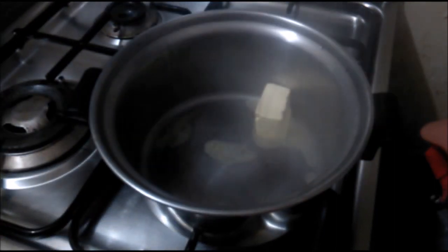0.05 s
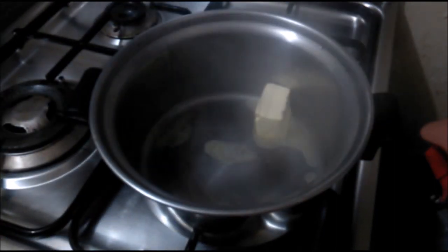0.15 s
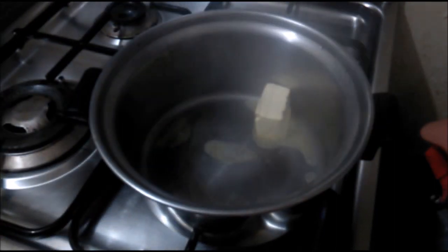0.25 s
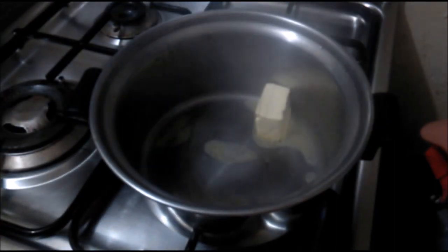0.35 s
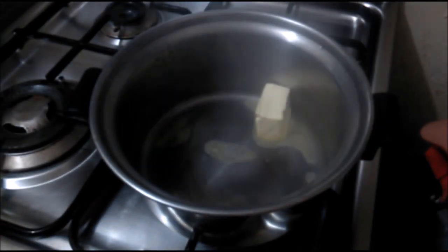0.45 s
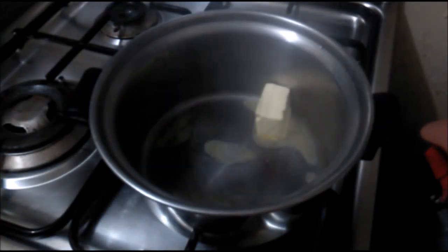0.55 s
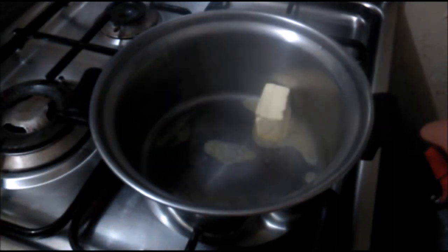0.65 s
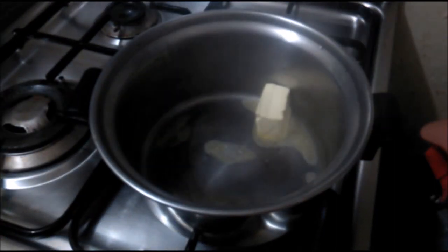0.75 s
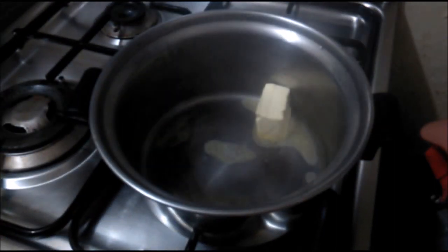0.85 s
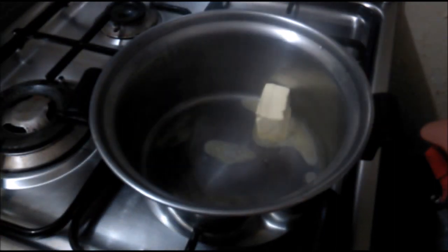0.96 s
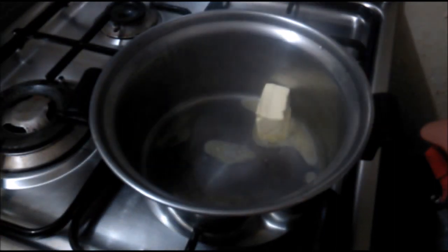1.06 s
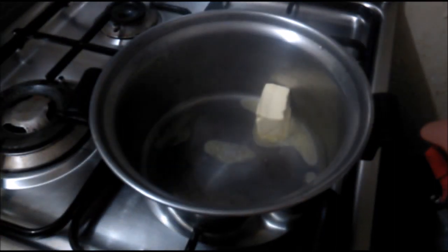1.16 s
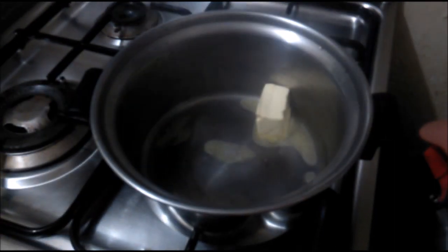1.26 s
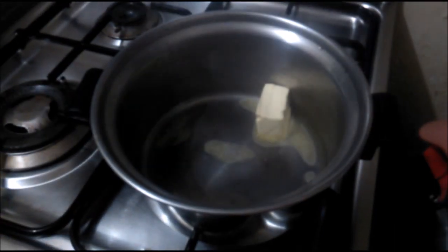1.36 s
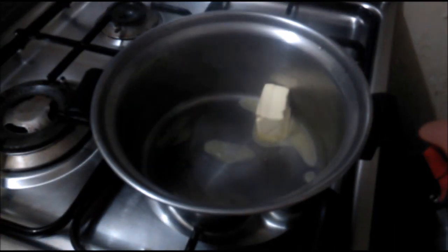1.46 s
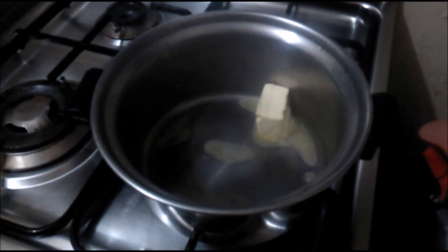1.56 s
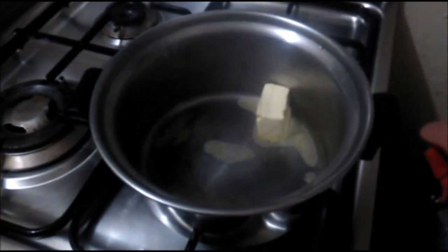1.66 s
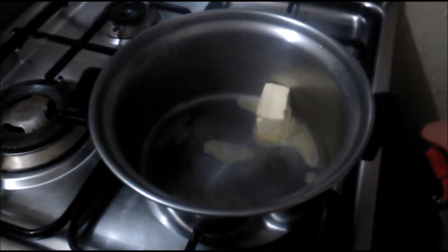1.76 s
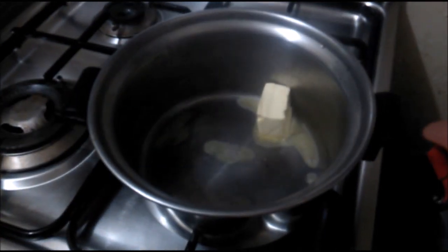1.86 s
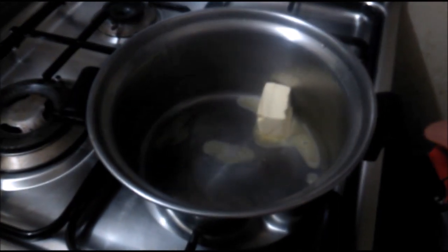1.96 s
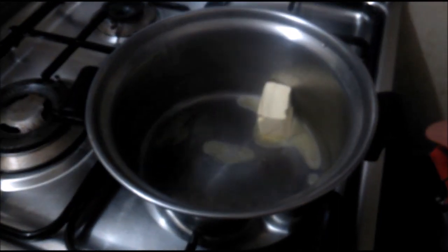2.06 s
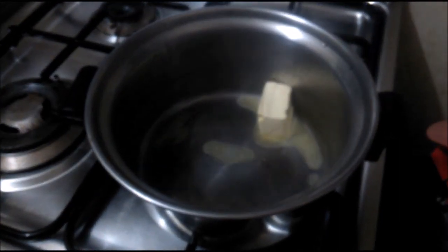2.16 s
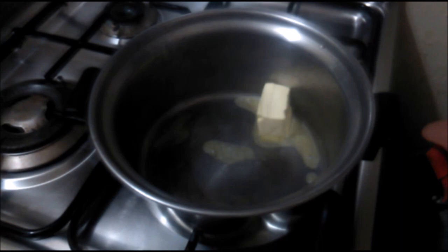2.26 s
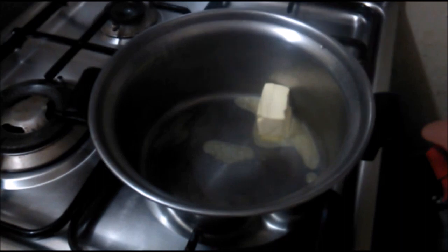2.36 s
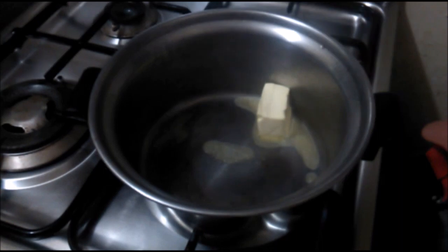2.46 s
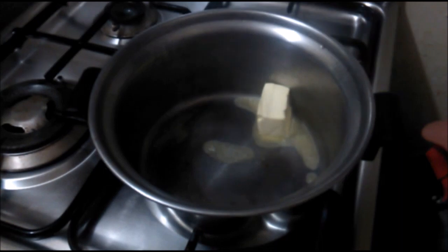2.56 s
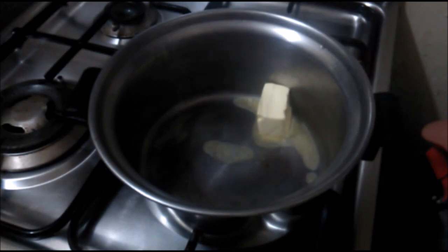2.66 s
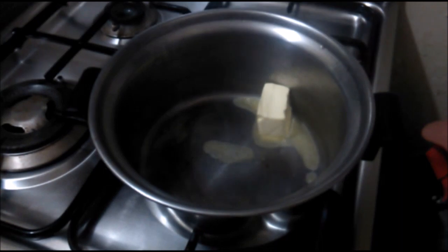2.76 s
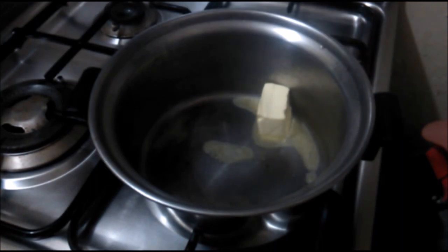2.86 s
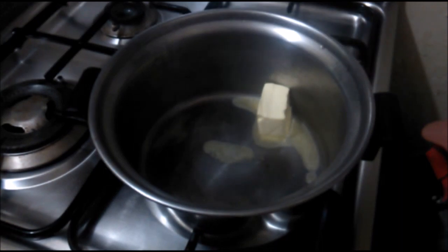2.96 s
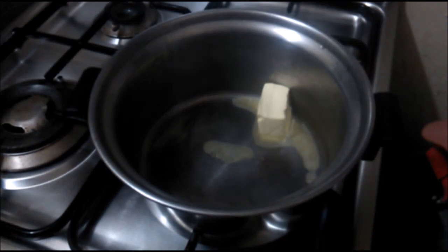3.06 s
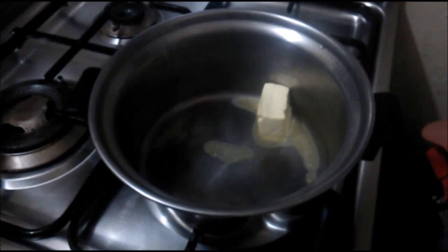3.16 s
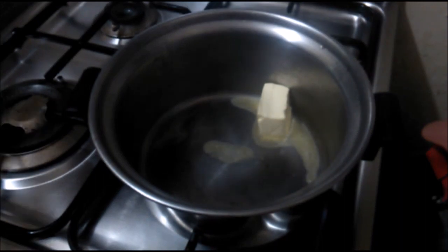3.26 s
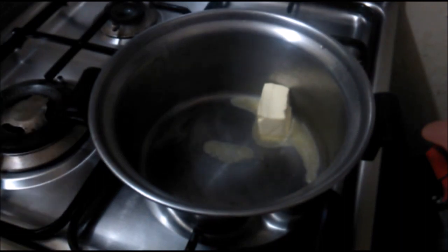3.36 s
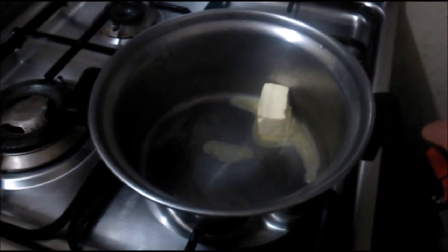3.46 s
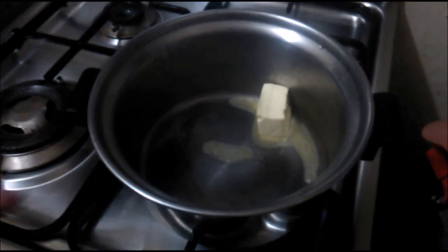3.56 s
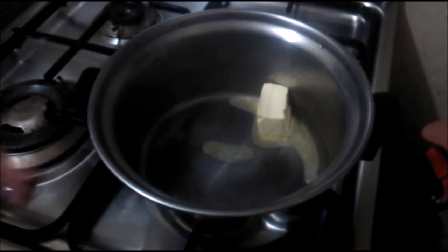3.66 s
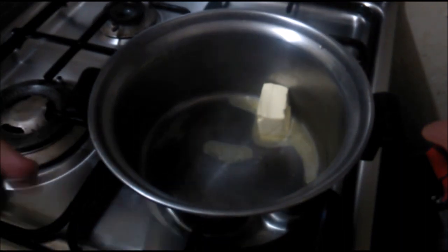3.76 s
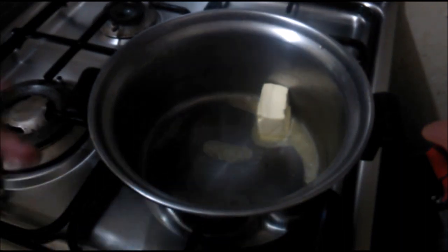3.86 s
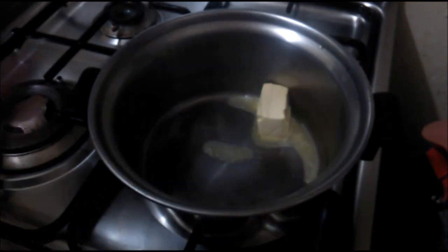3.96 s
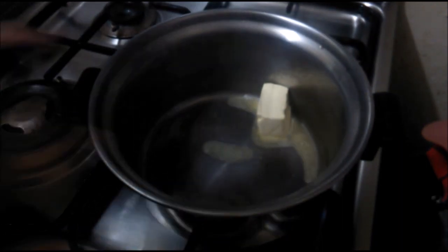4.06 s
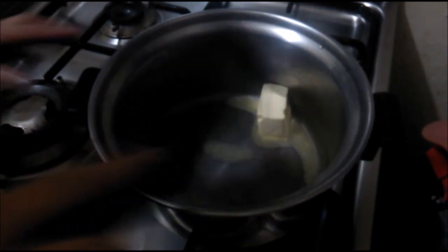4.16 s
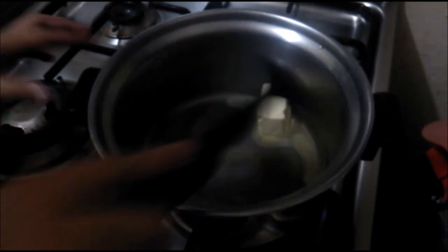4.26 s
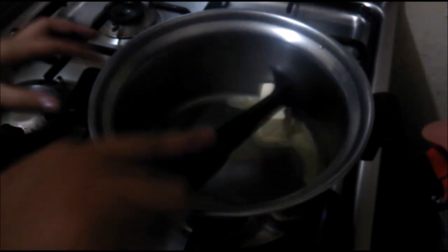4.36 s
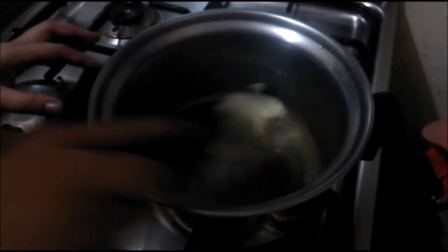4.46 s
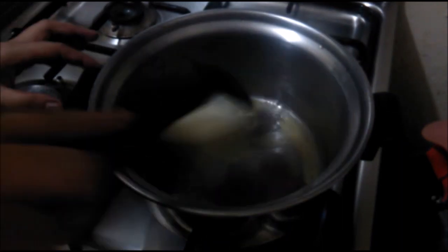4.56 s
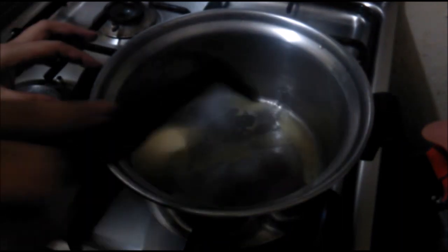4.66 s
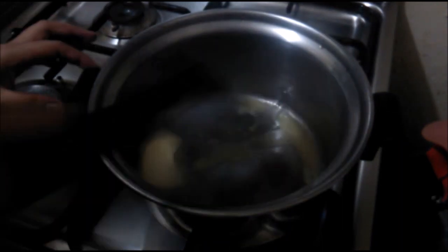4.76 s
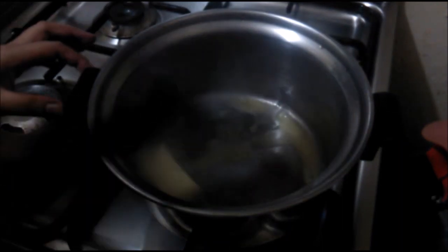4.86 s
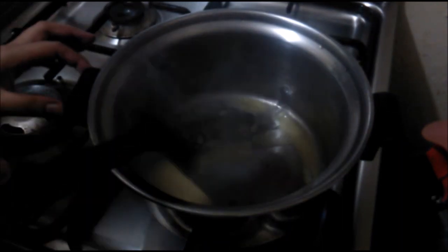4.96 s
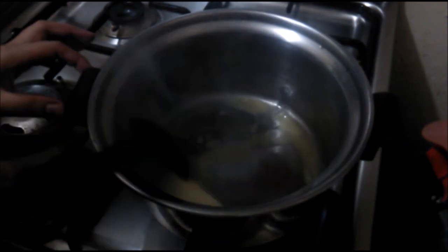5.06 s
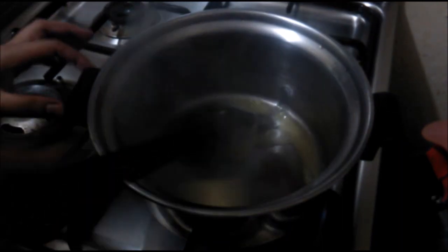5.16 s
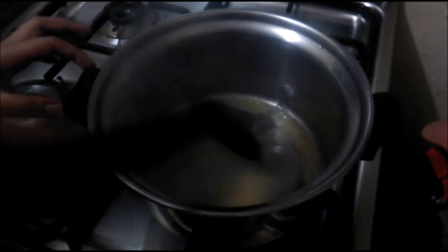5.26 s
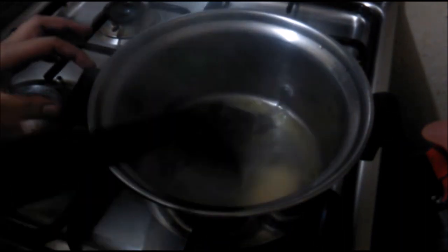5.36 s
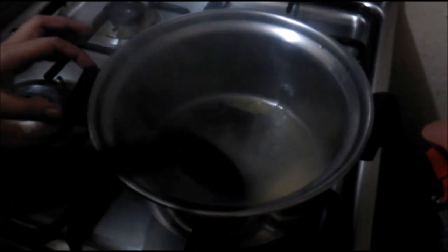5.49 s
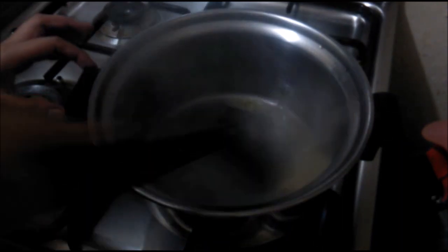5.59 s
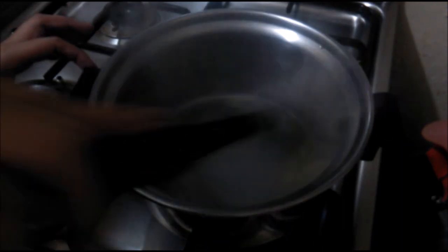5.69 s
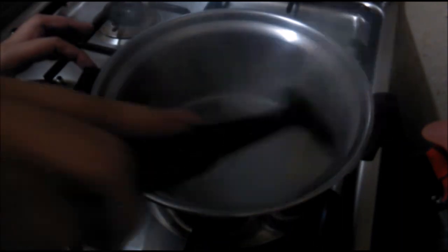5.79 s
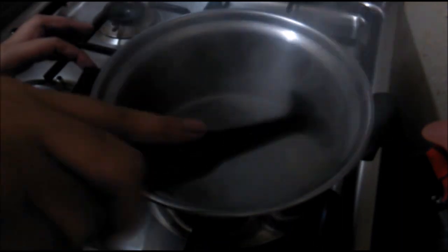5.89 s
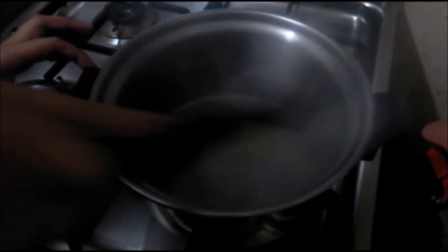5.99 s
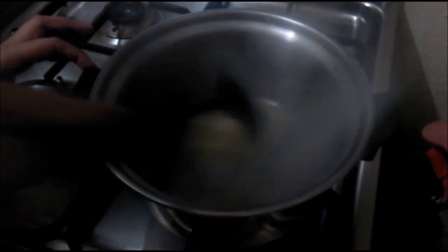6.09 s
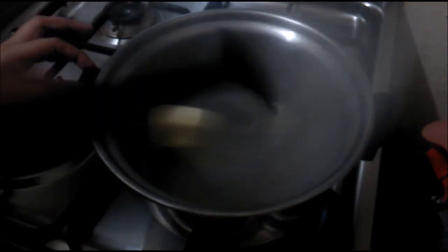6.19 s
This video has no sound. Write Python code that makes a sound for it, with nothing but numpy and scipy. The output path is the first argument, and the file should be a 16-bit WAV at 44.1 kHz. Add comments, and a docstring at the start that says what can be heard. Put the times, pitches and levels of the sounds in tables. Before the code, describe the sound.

Close above a pot in a small home kitchen, butter sizzles with bright, fine fizz, crackle and small spits over a faint beating electrical hum. A metal utensil rasps sharply early on, and two dull bumps follow mid-way. Then a spatula pushes the butter round: the sizzle swells and thickens, the blade knocks, judders and briefly squeals against the ringing steel, and softer strokes follow.

```python
"""Butter sizzling in a steel pot

Close on a kitchen stove, one microphone above the pot: butter melts over a low electrical hum.
Pulse trains make the fizz, crackle and spits; a hum of two beating pairs of sines lies behind.
A utensil scrapes as it is picked up, a pulse train driving its modes, and two dull noise bumps
sound in the room. Then a spatula pushes the butter round: the sizzle swells, and the blade
knocks, judders and squeals on the ringing pot, a bank of decaying sines."""
import sys
import numpy as np
from scipy import signal
from scipy.fft import rfft, irfft, next_fast_len
from scipy.io import wavfile
from scipy.ndimage import map_coordinates

SR = 44100
rng = np.random.default_rng(int(sys.argv[2]) if len(sys.argv) > 2 else 0)


def pcm_store(signal):
    """Save signal as 16-bit PCM."""
    levels = np.round(np.clip(np.atleast_2d(signal), -1, 1) * 32767)
    wavfile.write(sys.argv[1], SR, levels.astype(np.int16).T)


N = 274743

# Spectra, relative levels: (f/Hz, density/dB per Hz)
# distant: the rush of the room, and dull bumps
ROOM_SPECTRUM = [(20, -12), (55, 4), (130, -0.5), (200, -6), (400, -8.5), (1000, -18), (3000, -27.5),
                 (9000, -21)]
BUMP_SPECTRUM = [(40, -18), (100, 10), (200, -17), (295, 6), (370, -1.5), (435, -5.5), (550, 3), (640, -13),
                 (715, -6), (1000, -10.5), (1280, -12.5), (1700, -19), (2400, -17.5), (6000, -40)]
# the butter: fine fizz, coarse crackle
FIZZ_SPECTRUM = [(3000, -38), (6000, -26), (8500, -10), (10000, -3.5), (11200, 2), (12000, -1.5),
                 (13000, -3), (14300, -15.5)]
CRACKLE_SPECTRUM = [(200, -7), (600, -3.5), (1000, -11), (1270, 1), (1550, -9.5), (1850, -4.5),
                    (3400, -4.5), (4100, -1), (5100, 3.5), (6000, 4.5), (7500, 8), (10000, 1.5),
                    (14000, -23)]
# the butter: thin film behind the blade, larger bubbles under it, snaps of single bubbles
FILM_SPECTRUM = [(6000, -36), (10500, 13), (12500, 28), (14300, -23)]
HOLLOW_SPECTRUM = [(150, -7), (500, 1), (900, -3.5), (1250, 9), (1550, -1), (2700, 1.5),
                   (4500, 4.0), (8000, -22)]
SNAP_SPECTRUM = [(400, -18), (1300, -0.5), (2600, -16.5), (5000, 10), (9000, 14.0), (14000, -14.0)]
# the blade: its rasp on the steel, and the pot shuddering
BLADE_SPECTRUM = [(150, -20), (600, -6.5), (1200, -1), (1800, -11), (2700, -15), (4000, -19.5),
                  (7000, -22)]
SHUDDER_SPECTRUM = [(40, -14), (75, 11), (125, 16), (180, -4), (260, -2.0), (800, -60)]
# filter on the utensil's rasp: (f/Hz, gain/dB)
UTENSIL_RASP_GAIN = [(300, -18), (900, -18), (1400, -7.0), (1850, -15.0), (2600, -5.0), (3150, -8),
                     (4200, -16), (6500, -18), (14000, -12)]

# hum of a motor, perhaps the fridge: (multiple of the turn, mains level/dB rms, shaft level/dB rms)
HUM_PAIRS = [(1, -59, -57), (2, -53, -59)]
# decay of the kitchen's reverberation: (f/Hz, t60/s)
KITCHEN_DECAY = [(150, 0.17), (2000, 0.47), (12000, 0.24)]
# dull bumps: (t/s, level/dB, t60/s)
BUMP_EVENTS = [(2.812, -41.5, 0.49), (3.16, -49, 0.45), (4.482, -49.5, 0.5), (4.556, -41.5, 0.2),
               (4.665, -37, 0.28), (5.42, -45, 0.24), (5.741, -42.5, 0.39), (5.848, -45.5, 0.36),
               (6.195, -44.5, 0.16)]
# the utensil's modes: (f/Hz, relative level/dB, t60/s)
UTENSIL_MODES = [(795, -20, .12), (1290, -7, .07), (1415, 2, .09), (1497, -3, .1), (2218, -8, .1),
                 (2400, -5, .05), (2545, -4, .07), (2720, -5, .05), (2930, -3, .19), (3012, -3, .23),
                 (3075, -6, .17), (3125, -7, .17), (3520, -7, .1), (6280, -7, .05), (6480, -7, .05)]
# the utensil sliding: (t/s, length/s, rasp level before its filter/dB, drive of the ring/dB)
UTENSIL_SLIDES = [(0.205, 0.065, -32.5, -64), (0.31, 0.055, -33.5, -73), (0.774, .05, -21.5, -36.5)]
# single spits of water that stand out by level or pitch: (t/s, level/dB, pitch f/Hz, t60/s)
DISTINCT_SPITS = [(0.463, -37, 6850, 0.17), (0.897, -39.5, 6450, .08), (1.536, -44, 5100, 0.42),
                  (1.609, -47, 4230, 0.32), (1.713, -39.5, 2100, 0.018), (2.199, -45, 2580, 0.049),
                  (2.354, -41.5, 5000, 0.091), (2.598, -38, 5640, 0.066), (3.127, -36.5, 6940, .2),
                  (3.269, -44, 2640, .027), (3.308, -38, 4350, 0.046), (3.435, -39.5, 5840, 0.069)]
# the melt runs onto bare hot steel and flares up:
# (t/s, half width to 1/e/s, fizz gain/dB, crackle gain/dB)
BUTTER_FLARES = [(.28, 0.11, 1, 0), (.72, 0.75, 0.9, 0.6), (1.39, 0.082, 2.5, 2), (2.62, .06, 2, -1.5),
                 (2.95, .09, 1.6, -1), (3.38, 0.18, 2.5, 0.5), (3.61, 0.025, 3.5, 3), (3.952, 0.33, 2, 0.2),
                 (4.52, 0.039, 1, 6.5), (4.71, 0.15, 0.5, 3.5)]
# strokes of the spatula: (t/s, length before release/s, swell of the fizz/dB, base friction level/dB)
SPATULA_STROKES = [(4.492, 0.6, 6, -58), (5.132, 0.39, 5.5, -57), (5.67, 0.098, 3.5, -62.5),
                   (6.01, 0.15, 5.5, -81)]
# the pot's modes: (f/Hz, relative level/dB, t60/s)
POT_MODES = [(327, -6, .3), (519, -26, .12), (769, -18, .25), (916, -5, .2), (1031, -1, .33),
             (1182, -13, .2), (1277, -14, .15), (1390, -14, .1), (1513, -21, .2), (1700, -9, .13),
             (1782, -9, .18), (2062, -17, .2), (2260, -19, .18), (2430, -22, .14), (2660, -21, .1),
             (3060, -22, .08), (3240, -21, .09)]
# the spatula striking the pot: (t/s, ring level/dB, favoured pitch f/Hz)
SPATULA_KNOCKS = [(4.56, -38, 450), (4.667, -18, 310), (5.4, -16, 1700), (5.432, -20, 880),
                  (5.442, -28, 330), (5.851, -33, 390), (6.199, -34.5, 338)]
# the blade catches on the wall: (t of hardest pressure/s, friction level/dB, squeal level/dB rms)
BLADE_CATCHES = [(5.17, -77.5, -50), (5.3, -62, -48), (5.368, -45, -33), (5.417, -31, -22.5),
                 (5.441, -58, -27), (5.497, -68, -42), (5.526, -68, -41.5)]
# the pot shuddering on the burner grate: (t/s, length before release/s, level/dB)
POT_SHUDDERS = [(4.68, 0.23, -51.5), (5.52, 0.046, -46.5), (5.77, 0.09, -44)]
# brief dips in level under the top fizz: (t/s, depth where fully felt/dB)
LEVEL_DIPS = [(0.844, 8), (1.243, 16), (1.687, 14), (1.802, 14), (3.15, 7), (4.102, 16.5), (4.167, 15),
              (4.309, 17), (4.469, 14.5), (4.634, 17), (4.794, 15.5), (5.119, 17), (5.236, 16), (5.55, 65),
              (6.141, 16)]
# how far the dips act on each band: (f/Hz, share)
DIP_SHARE = [(100, .3), (400, 1), (8500, 1), (10500, .05), (14000, .2)]

ROOM_DB = -58.5  # dB rms
MAINS_HZ, MOTOR_HZ = 60, 58.28
# faint low tone: time of its peak (s), pitch there (Hz), glide (Hz a second), peak level (dB rms)
TONE_S, TONE_HZ, TONE_HZ_PER_S, TONE_DB = .79, 271, 71, -58.5
SNAP_DB, SNAPS_PER_S = -59, 60  # dB rms, pops a second
FIZZ_DB, CRACKLE_DB = -36, -45.5  # base levels, dB
# stirring: start (s), time to spread the butter (s), gain of the crackle (dB)
STIR_S, SPREAD_S, STIR_CRACKLE_DB = 4.42, 0.29, 1.5
STROKE_ATTACK_S, STROKE_RELEASE_S = 0.11, 0.32
CATCH_RISE_DB_PER_S, CATCH_FALL_DB_PER_S = 300, 233
SHUDDER_ATTACK_S, SHUDDER_RELEASE_S = 0.024, 0.063
# drive of the pot's ring over the rasp at full pressure (dB); extra dB lost per dB less pressure
RING_DB, RING_PRESSURE = 0.5, 0.32
FOCUS_DB = 22  # what a knock's modes lose an octave from its favoured pitch, dB
SQUEAL_HZ, SQUEAL_WAVER_DB = 1031, .8
SQUEAL_RISE_DB_PER_S, SQUEAL_FALL_DB_PER_S = 560, 520
DIP_S = 0.018  # half length of a dip, s
TOP_HZ = 14350  # band limit, Hz


def amp(db):
    """Decibels to gain."""
    return 10 ** (np.asarray(db) / 20)


def unit(x):
    """x at rms 1."""
    return x / np.sqrt(np.mean(x ** 2) + 1e-20)


def clock(size):
    """The time of each sample, in seconds."""
    return np.arange(size) / SR


def along(points, hz):
    """Read (f/Hz, value) points on a log frequency axis."""
    f, v = np.transpose(points)
    return np.interp(np.log(hz + 1), np.log(f + 1), v)


def wobble(rate):
    """A smooth random curve, rate knots a second."""
    steps = np.arange(0, N / SR * rate + 1, 1 / 8)
    knots = rng.standard_normal(N // 32)
    smooth = map_coordinates(knots, [steps], order=3, mode="wrap")
    return np.interp(clock(N) * rate, steps, smooth)


def filtered(x, response):
    """x times a response of frequency."""
    m = next_fast_len(len(x) + SR // 4)
    spectrum = rfft(x, m) * response(np.fft.rfftfreq(m, 1 / SR))
    return irfft(spectrum, m)[:len(x)]


def coloured(x, spectrum):
    """x shaped by the given spectrum, at rms 1."""
    return unit(filtered(x, lambda hz: amp(along(spectrum, hz))))


def add(track, s, sound):
    """Mix a sound into the track at s seconds."""
    part = track[max(round(s * SR), 0):][:len(sound)]
    part += sound[:len(part)]


def held(s, length, attack, release):
    """A gain that rises to 1 from s, holds to the end of the length and dies away."""
    t = clock(N) - s
    return np.clip(t / attack, 0, 1) * np.exp(-np.maximum(t - length, 0) / release)


def peaked(s, rise_db, fall_db):
    """A gain that climbs to 1 at s and falls again, at so many dB a second."""
    t = clock(N) - s
    return amp(np.minimum(rise_db * t, -fall_db * t))


def pops(size, rate, spread_db):
    """Random impulses of uneven size and either sign, rate a second, at rms 1."""
    hit = rng.random(size) < rate / SR
    sign = rng.choice([-1, 1], size)
    strength = amp(spread_db * np.minimum(rng.standard_normal(size), 2.5))
    return unit(hit * sign * strength)


def ring(modes, scatter_db):
    """A steel body's answer to one tap: decaying modes, their levels a little different each time."""
    t = clock(SR // 2)
    out = np.zeros(len(t))
    for k, (hz, db, t60) in enumerate(modes):
        decay = amp(db + scatter_db * rng.standard_normal() - 60 * t / t60)
        out += (-1) ** k * decay * np.sin(2 * np.pi * hz * t)
    return out


def rubbed(force, modes):
    """Friction drives the modes, which ring on after it stops."""
    body = ring(modes, scatter_db=7.5)
    return signal.fftconvolve(force, body / np.linalg.norm(body))[:N]


def background():
    """The motor turns a little slower than the mains, so the two hums beat; the room rushes softly."""
    out = amp(ROOM_DB) * coloured(rng.standard_normal(N), ROOM_SPECTRUM)
    for multiple, mains_db, shaft_db in HUM_PAIRS:
        turn = 2 * np.pi * multiple * clock(N)
        mains = amp(mains_db + 0.3 * wobble(24.3)) * np.sin(MAINS_HZ * turn)
        shaft_level = amp(shaft_db + 0.48 * wobble(3.27))
        shaft = shaft_level * np.sin(MOTOR_HZ * turn + 0.074 * wobble(4.16))
        out += np.sqrt(2) * (mains - shaft)
    return out + low_tone()


def low_tone():
    """A faint sine swells while its pitch rises, then drops away quickly."""
    hz = TONE_HZ + TONE_HZ_PER_S * (clock(N) - TONE_S)
    level = amp(TONE_DB) * peaked(TONE_S, rise_db=52, fall_db=500)
    return np.sqrt(2) * level * np.sin(2 * np.pi * np.cumsum(hz) / SR)


def kitchen(x):
    """The walls' answer: x convolved with decaying noise, each band at its own t60."""
    hz, t, z = signal.stft(rng.standard_normal(SR // 2), SR, nperseg=256)
    decay = amp(-60 * t / along(KITCHEN_DECAY, hz)[:, None])
    tail = signal.istft(z * decay, SR, nperseg=256)[1]
    delayed = np.pad(tail, (SR // 200, 0))  # 5 ms before the first reflection
    return signal.fftconvolve(x, delayed / np.linalg.norm(tail))[:N]


def bumps():
    """Dull knocks, bursts of noise that die away in the stove top and the room."""
    out, t = np.zeros(N), clock(SR // 2)
    for s, db, t60 in BUMP_EVENTS:
        envelope = amp(db - 60 * t / t60) * (1 - np.exp(-t / 0.00043))
        add(out, s, envelope * coloured(rng.standard_normal(len(t)), BUMP_SPECTRUM))
    return out


def utensil():
    """Short rasping slides of a metal utensil; the slips drive its modes, clearly only in the hard one."""
    rasp, force = np.zeros(N), np.zeros(N)
    for s, length, rasp_db, ring_db in UTENSIL_SLIDES:
        slips = pops(SR // 4, rate=1500, spread_db=-0.5)[:round(length * SR)]
        slips = slips * signal.windows.tukey(len(slips), .3)
        add(rasp, s, amp(rasp_db) * slips)
        add(force, s, amp(ring_db) * slips)
    ringing = rubbed(force, UTENSIL_MODES)
    return ringing + filtered(rasp, lambda hz: amp(along(UTENSIL_RASP_GAIN, hz)))


def spit(hz, t60, width):
    """A water pocket boils off: a dying train of pops around one pitch."""
    t = clock(SR // 6)
    train = pops(len(t), rate=5000, spread_db=6)
    train = filtered(train, lambda f: 1 / (1 + ((f - hz) / (width * hz)) ** 2))
    return unit(train) * amp(-60 * t / t60) * (1 - np.exp(-t / 0.00032))


def spitting():
    """A few distinct spits among many random ones, and the thin snaps of single bubbles."""
    snaps = pops(N, rate=SNAPS_PER_S, spread_db=3)
    out = amp(SNAP_DB) * coloured(snaps, SNAP_SPECTRUM)
    for s, db, hz, t60 in DISTINCT_SPITS:
        add(out, s, amp(db) * spit(hz, t60, width=0.18))
    # spits at random times, on the whole louder the higher their pitch
    for when, size, pitch, life in rng.random(size=(140, 4)):
        level = amp(-48 + 1.9 * size + 6 * pitch)
        add(out, when * N / SR, level * spit(4500 + 4500 * pitch, 0.046 + 0.17 * life, width=0.091))
    return out


def frying(stirred):
    """Levels of fizz and crackle (dB): both waver and flare; strokes swell the fizz, stirring the crackle."""
    swells = [db * held(s, length, STROKE_ATTACK_S, STROKE_RELEASE_S)
              for s, length, db, _ in SPATULA_STROKES]
    fizz_db = FIZZ_DB + np.max(swells, axis=0) + 0.1 * (1 - stirred) * wobble(7.8)
    crackle_db = CRACKLE_DB + STIR_CRACKLE_DB * stirred + 0.13 * wobble(7.4)
    for s, width, fizz_gain_db, crackle_gain_db in BUTTER_FLARES:
        flare = np.exp(-((clock(N) - s) / width) ** 2)
        fizz_db = fizz_db + fizz_gain_db * flare
        crackle_db = crackle_db + crackle_gain_db * flare
    return fizz_db, crackle_db


def sizzle():
    """Tiny steam bubbles burst in flurries; stirring spreads the butter, so they come denser."""
    stirred = np.clip((clock(N) - STIR_S) / SPREAD_S, 0, 1)
    fizz_db, crackle_db = frying(stirred)
    density = 1 + 2 * stirred
    fine_flurry = amp(1.1 * wobble(45) + 0.6 * wobble(260))
    fine = coloured(pops(N, rate=11000 * density, spread_db=-1.0) * fine_flurry, FIZZ_SPECTRUM)
    # the thin film behind the blade makes the smallest bubbles
    film = coloured(pops(N, rate=6000, spread_db=10), FILM_SPECTRUM)
    fizz = amp(fizz_db) * (amp(2.6 - 1.14 * stirred) * fine + amp(-7) * stirred * film)
    # the crackle's flurries even out with stirring
    coarse_flurry = amp((2.3 - 3.1 * stirred) * wobble(35))
    coarse = pops(N, rate=4500 * density, spread_db=-2.0) * coarse_flurry
    crackle = amp(crackle_db) * coloured(coarse, CRACKLE_SPECTRUM)
    # bubbles under the blade are larger and sound the hollow of the pot
    hollow = coloured(pops(N, rate=5000, spread_db=6.0), HOLLOW_SPECTRUM)
    return fizz + crackle + stirred * amp(crackle_db - 6) * hollow


def friction():
    """Level of the blade's friction (dB): light and uneven along each stroke, hard where it catches."""
    gliding = sum(amp(db) * held(s, length, STROKE_ATTACK_S, STROKE_RELEASE_S)
                  for s, length, _, db in SPATULA_STROKES)
    catching = sum(amp(db) * peaked(s, CATCH_RISE_DB_PER_S, CATCH_FALL_DB_PER_S)
                   for s, db, _ in BLADE_CATCHES)
    force = gliding * amp(4.8 * wobble(30)) + catching
    return 20 * np.log10(force + 1e-9)


def knock(centre_hz, focus_db):
    """The spot where the blade lands favours modes around one pitch; others lose focus_db an octave."""
    modes = [(hz, db - focus_db * abs(np.log2(hz / centre_hz)), t60) for hz, db, t60 in POT_MODES]
    soft_edge = 1 - np.exp(-clock(SR // 2) / 0.0015)
    return ring(modes, scatter_db=-1.5) * soft_edge


def spatula():
    """The blade sticks and slips over the steel, knocks on the wall with its soft edge and shakes the pot."""
    drag_db = friction()
    rasp = coloured(pops(N, rate=2300, spread_db=5.0), BLADE_SPECTRUM)
    out = amp(drag_db) * rasp
    # only a hard-pressed blade cuts through the fat and rings the steel
    pressure_db = drag_db - drag_db.max()
    drive = amp(drag_db + RING_PRESSURE * pressure_db + RING_DB)
    out += rubbed(pops(N, rate=1300, spread_db=-4.0) * drive, POT_MODES)
    shudder = sum(amp(db) * held(s, length, SHUDDER_ATTACK_S, SHUDDER_RELEASE_S)
                  for s, length, db in POT_SHUDDERS)
    out += shudder * coloured(rng.standard_normal(N), SHUDDER_SPECTRUM)
    for s, db, centre_hz in SPATULA_KNOCKS:
        add(out, s, amp(db) * knock(centre_hz, focus_db=FOCUS_DB))
    return out


def squeal():
    """Against the wall the blade's slips fall in step with one strong mode of the pot and make it sing."""
    level = sum(amp(db) * peaked(s, SQUEAL_RISE_DB_PER_S, SQUEAL_FALL_DB_PER_S)
                for s, _, db in BLADE_CATCHES)
    phase = 2 * np.pi * SQUEAL_HZ * clock(N) + .3 * wobble(60)
    return np.sqrt(2) * level * amp(SQUEAL_WAVER_DB * wobble(90)) * np.sin(phase)


def faltering(x):
    """Now and then the level dips briefly, mostly between the hum and the top fizz."""
    t = clock(N)
    depth_db = sum(db * np.maximum(1 - abs(t - s) / DIP_S, 0) for s, db in LEVEL_DIPS)
    f, share = np.transpose(DIP_SHARE)
    body = filtered(x, lambda hz: np.interp(hz, f, share))
    return x - (1 - amp(-depth_db)) * body


def scene():
    """Everything at one microphone above the pot, the same in both channels."""
    near = sizzle() + spitting() + spatula()
    away = utensil() + bumps()
    room = kitchen(amp(-10.5) * near + amp(-9.5) * away)
    mono = faltering(near + away + room + background()) + squeal()
    return np.array([mono, mono])


def record(dry):
    """The recorder keeps nothing above its band limit."""
    return np.array([filtered(channel, lambda hz: hz < TOP_HZ) for channel in dry])


dry = scene()
out = record(dry)
pcm_store(out)
```